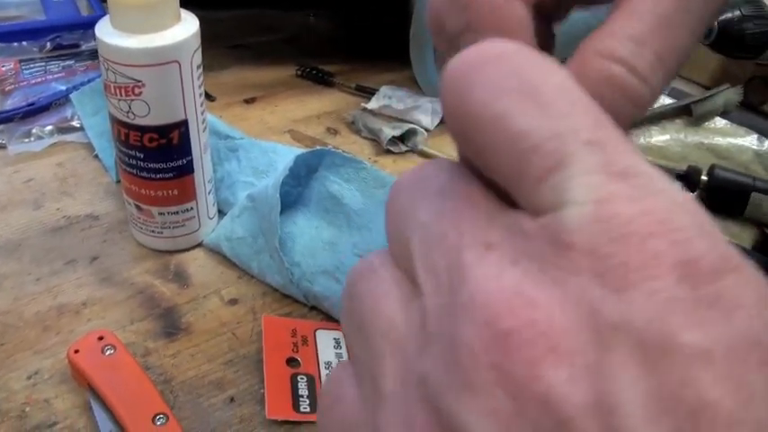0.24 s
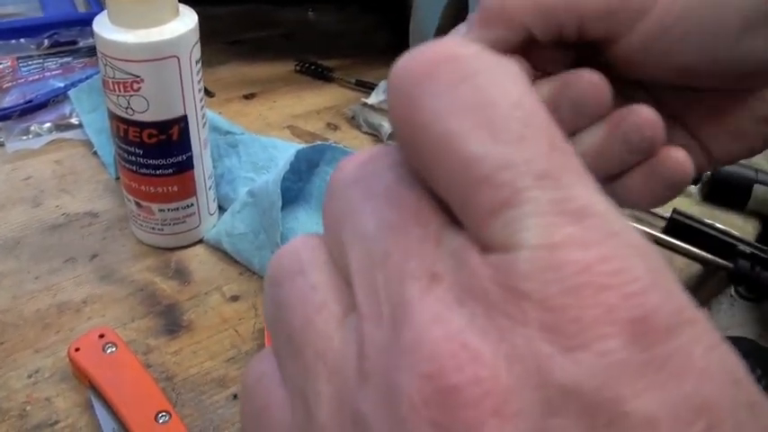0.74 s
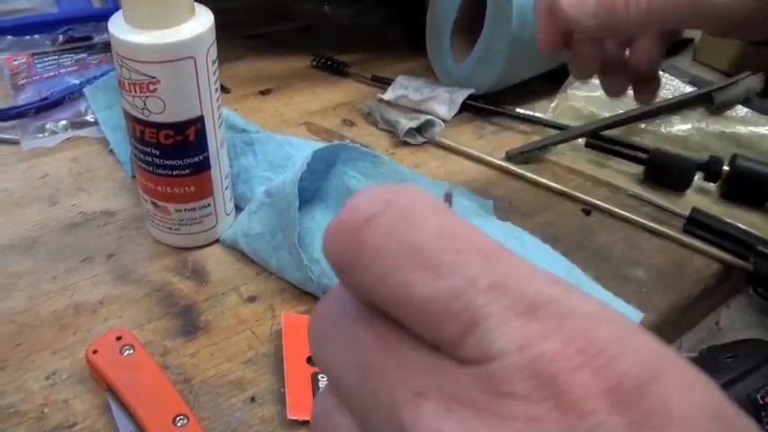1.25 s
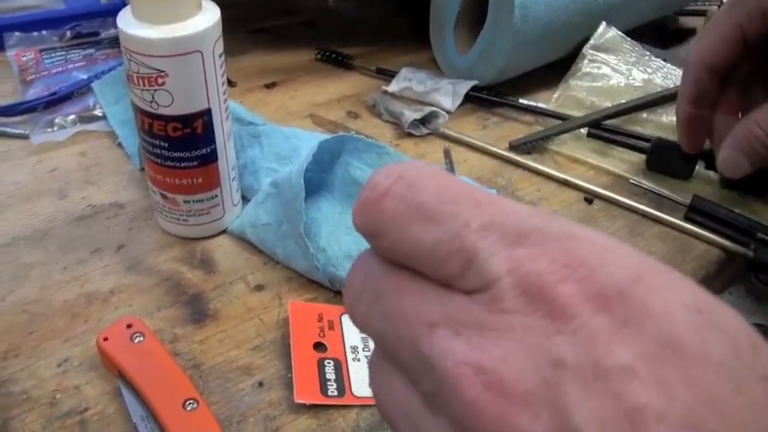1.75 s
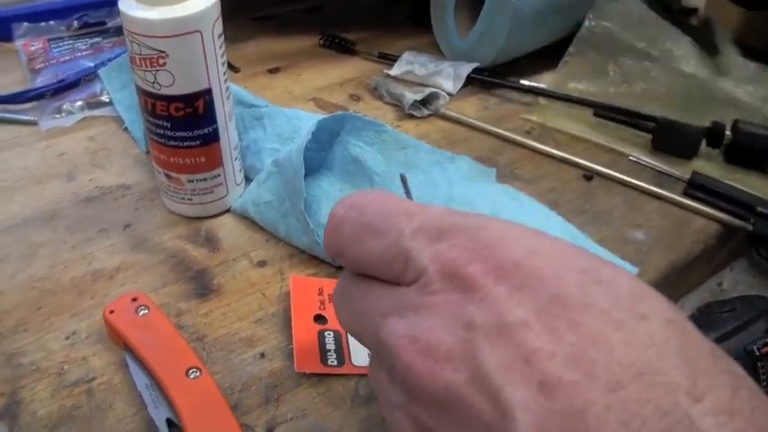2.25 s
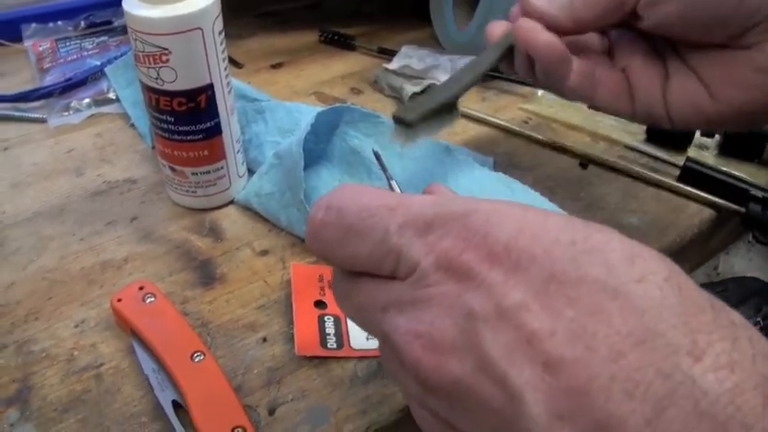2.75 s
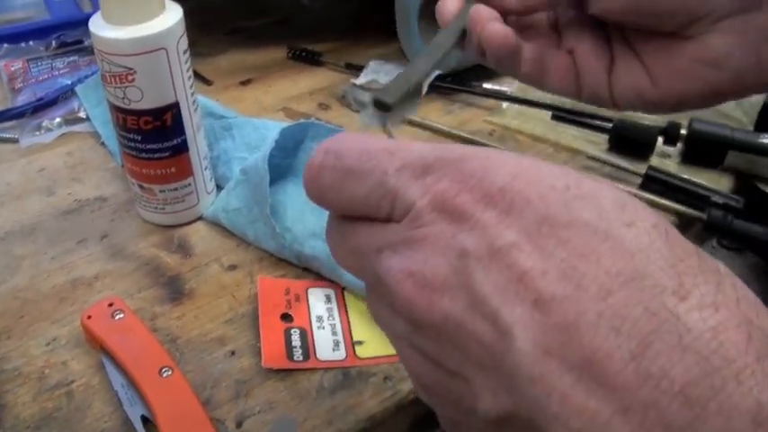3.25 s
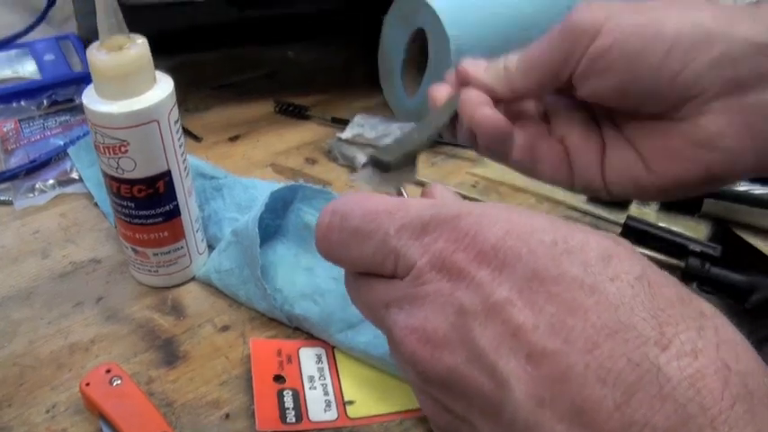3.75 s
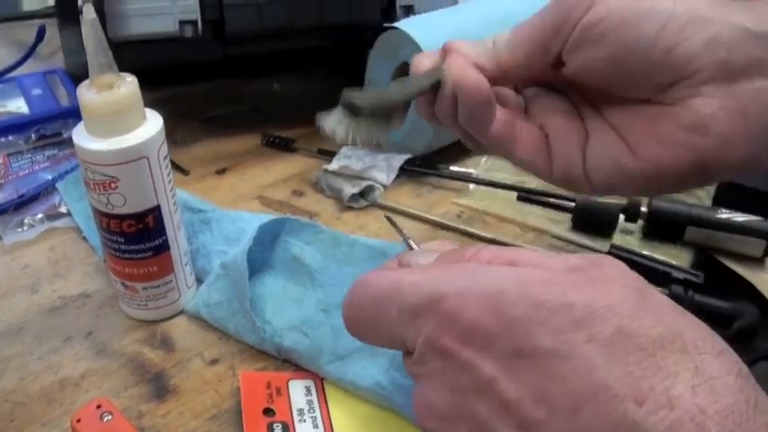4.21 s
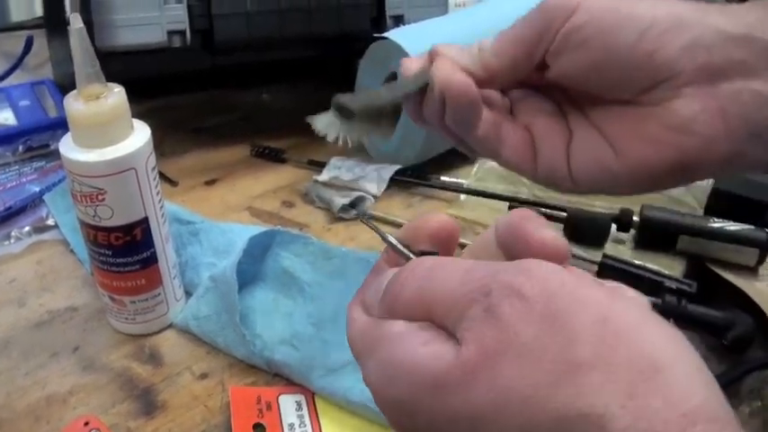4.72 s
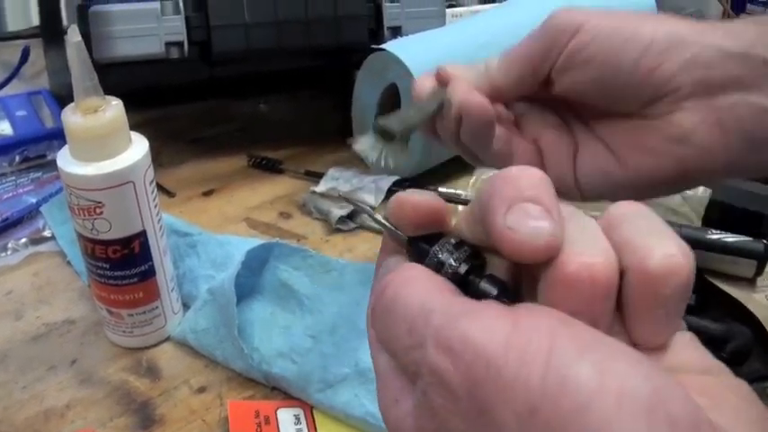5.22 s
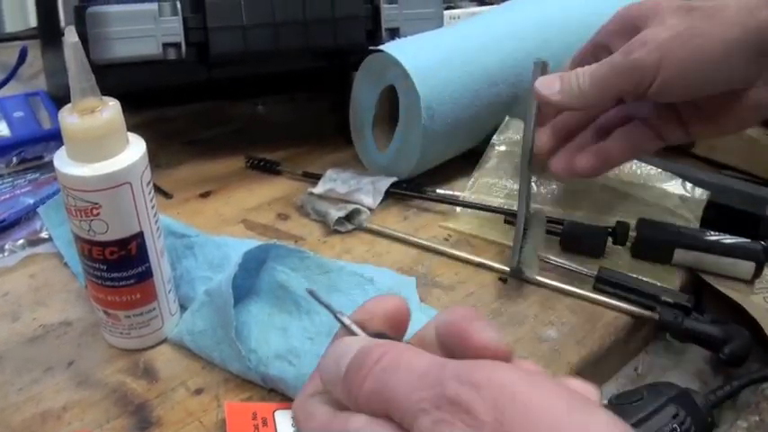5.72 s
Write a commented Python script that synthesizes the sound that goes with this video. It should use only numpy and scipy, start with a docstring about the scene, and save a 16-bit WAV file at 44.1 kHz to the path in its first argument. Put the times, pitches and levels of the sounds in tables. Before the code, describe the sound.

A close stereo view of a wooden bench in a small workshop, with steady soft hiss and a very faint low hum. For the first two seconds there is little but gentle finger rubs, light swishes and tiny ticks, around 0.6 to 1.3 s. From about 2.05 to 2.55 s a brush is grabbed from among tools: dense hard clacks, bright rattles and small bench thumps, with a plastic bag crackling, slightly to the right. From 2.75 to 5.45 s come eleven brisk bristle strokes over a small steel tap, roughly one every quarter second. Each is a dry, high, scratchy swish under a tenth of a second, some starting with a tick, with slight hollow brush-head and thin metal ringing; the last ones are loudest. At about 5.8 to 5.95 s the brush drops back with a few clacks, a crisp crinkle and a soft hand rub. Short faint room reverberation follows.

```python
"""At a wooden workbench, close up, a stiff cleaning brush is picked off a plastic bag among tools.
The knocks are short bursts of tiny impacts that ring the tools and thump the bench; the bag is snapping creases.
The bristles sweep eleven times across a small steel thread tap, as streams of clicks that also shake the brush head
and the tap; then the brush is dropped back. Fingers rub and tick softly, made from swelling noise and short clicks.
The small workshop adds echoes, a quiet hiss and a low hum."""
import sys
import numpy as np
from scipy import signal
from scipy.fft import rfft, irfft, next_fast_len
from scipy.io import wavfile

SR = 44100
rng = np.random.default_rng(int(sys.argv[2]) if len(sys.argv) > 2 else 0)


def to_wav(s):
    """Save 16-bit WAV."""
    ch = np.atleast_2d(s).T  # columns
    pcm = np.round(np.clip(ch, -1, 1) * 32767)  # PCM
    wavfile.write(sys.argv[1], SR, pcm.astype(np.int16))


N = 263277
TIME = np.arange(N) / SR


def from_db(db):
    """Turn decibels into an amplitude factor."""
    return 10 ** (np.asarray(db) / 20)


def rms_one(x):
    """Scale a sound to an rms level of 1."""
    return x / np.sqrt(np.mean(x ** 2) + 1e-20)


def band(x, low_hz, high_hz, order=2):
    """Keep only the pitches between two limits (Butterworth band-pass)."""
    edges = [low_hz, min(high_hz, .47 * SR)]
    return signal.sosfilt(signal.butter(order, edges, "band", fs=SR, output="sos"), x + 1e-18)


def resonate(x, hz, width_hz):
    """Ring at one pitch, with gain 1 at the peak; a narrower width rings longer."""
    r = np.exp(-np.pi * width_hz / SR)
    gain = (1 - r * r) / 2
    feedback = [1, -2 * r * np.cos(2 * np.pi * hz / SR), r * r]
    return signal.lfilter(np.array([1, 0, -1]) * gain, feedback, x + 1e-18)


def ring(x, modes):
    """An object that is struck or shaken answers at all its own pitches at once."""
    return sum(from_db(db) * resonate(x, hz, width) for hz, width, db in modes)


def colour(x, spectrum):
    """Filter a sound to follow a spectrum, without smearing it ahead in time (minimum phase); rms 1."""
    size = 2 * next_fast_len(N // 2 + 4096)
    hz, db = np.transpose(spectrum)
    grid = np.maximum(np.arange(size // 2 + 1) * SR / size, 1)
    gain = from_db(np.interp(np.log(grid), np.log(hz), db))
    cepstrum = irfft(np.log(gain))
    # folding the cepstrum onto positive times gives the minimum-phase filter
    response = np.exp(rfft(2 * cepstrum[:size // 2], size))
    return rms_one(irfft(rfft(x, size) * response)[:N])


def add(track, s, sound):
    """Lay a short sound into a track."""
    start = int(s * SR)
    track[start:start + len(sound)] += sound[:N - start]


def grains(per_s, spread_db):
    """Tiny clicks of uneven size at random moments; rms 1."""
    sizes = from_db(spread_db * np.minimum(rng.exponential(1, N), 4))
    signed = sizes * rng.choice([-1, 1], N)
    return rms_one(signed * (rng.random(N) < per_s / SR))


def contact(rise_s, decay_s, tail_db, tail_s):
    """Two things touch: a burst of tiny impacts that dies fast, then a weaker shiver."""
    t = TIME[:SR // 10]
    fading = np.exp(-t / decay_s) + from_db(tail_db) * np.exp(-t / tail_s)
    shape = np.minimum(t / rise_s, 1) * fading
    return shape * rng.choice([-1, 1], len(t)) * rng.uniform(.5, 1, len(t))


def at_level(burst, db):
    """Scale a burst to an rms level over its first 6 ms."""
    return from_db(db) * burst / np.sqrt(np.mean(burst[:int(.006 * SR)] ** 2))


def swell(s, length_s):
    """A smooth bell in time, centred on a moment."""
    return np.exp(-2 * ((TIME - s) / length_s) ** 2)


def place(x, pan_db):
    """Place a sound in stereo; pan_db is the left level minus the right."""
    return x * from_db([[pan_db / 2], [-pan_db / 2]])


# Colour of the room hiss: pitch_hz, gain_db
AIR_COLOUR = [(18, -49), (30, -2), (124, -8.5), (174, -4.5), (328, -2.5), (384, -4.5), (760, -1),
              (889, -4.5), (1280, -5), (1630, -7.5), (2230, -8.5), (8520, -17), (14800, -19), (16000, -24)]
AIR_DB = -58.5   # rms level of the part shared by both sides
HUM_HZ, HUM_DB = 118.5, -72.5


def background(side_db=-1):
    """Steady noise that differs from left to right makes the hiss; one sine makes the low hum."""
    mid, side = [colour(noise, AIR_COLOUR) for noise in rng.standard_normal((2, N))]
    hiss = mid + from_db(side_db) * side * [[1], [-1]]
    hum = np.sin(2 * np.pi * HUM_HZ * TIME)
    return from_db(AIR_DB) * hiss + from_db(HUM_DB) * hum


# Hands shifting on the tool and leaning on the bench: middle_s, length_s, level_db, pitch_hz
HAND_RUBS = [(0.024, 0.25, -61, 290), (.63, 0.023, -54.5, 1970), (1.592, 0.31, -65, 270),
             (1.826, 0.037, -55, 164), (1.828, 0.02, -53.5, 660), (3.014, 0.033, -51.5, 192),
             (3.775, .13, -59.5, 730), (3.827, 0.045, -62.5, 41.2), (4.46, 0.051, -63, 42),
             (4.463, 0.087, -51, 556), (4.503, 0.62, -65, 229), (5.717, 0.21, -59, 1690),
             (5.887, 0.2, -49.5, 260)]


def hands(breadth=1.04):
    """Skin rubs on the tool holder and the bench: many tiny slips, each rub swelling around its own pitch."""
    friction = grains(per_s=3400, spread_db=0.5)
    out = np.zeros(N)
    for s, length, db, hz in HAND_RUBS:
        rub = band(resonate(friction, hz, breadth * hz), hz / 2, 3 * hz, order=1)
        out += from_db(db) * swell(s, length) * rms_one(rub)
    return out


# Single bristles or a fingertip flicking the tap: start_s, level_db, pitch_hz
FLICKS = [(0.6233, -48.5, 3500), (1.19, -48.5, 3470), (3.3526, -29, 1880), (3.6082, -32.5, 5000),
          (4.077, -34, 3920), (4.166, -28.5, 11500), (5.401, -30.5, 10520)]
# Brush strokes, played here and in brushing(): touch_s, grazing_s, rasping_s, level_db,
# touch_tick_db (over level_db), then brush_head_db and tap_ring_db (over level_db, before the trims in brushing)
STROKES = [(2.746, 0.027, .046, -35.5, -10.5, -13, -17.5), (3.0137, 0.047, .028, -28.5, -15, -11, -20),
           (3.294, 0.024, 0.037, -28.5, -31, -13, -33), (3.5494, 0.02, 0.049, -28.5, -14, -14, -18),
           (3.8097, 0.035, 0.059, -30.5, -7, -11, -12), (4.122, .036, 0.027, -33.5, -19, -23, -20),
           (4.3579, 0.015, 0.045, -32, -10.5, -6.5, -3), (4.6142, .023, 0.05, -29, -4.5, -8, -7),
           (4.860, .027, 0.043, -28, -5, -7.5, -15), (5.124, .029, 0.029, -26, -7, -6.5, -14),
           (5.3769, .051, .038, -24.5, -25, -11.5, -12.5)]
# Pitches of the steel tap in its holder: pitch_hz, width_hz, gain_db
TAP_MODES = [(3480, 79, 10), (3675, 144, 13), (4770, 380, 2), (7080, 200, 5.5), (9950, 320, 9.5),
             (12000, 370, -2)]
TOUCH_HZ = 4020   # extra ring at the first touch of each stroke


def flicks(steel_db=-4, ring_db=-4, ring_width_hz=600):
    """A bristle or fingertip catches and lets go with a bright tick of the steel; every stroke starts with one."""
    out = np.zeros(N)
    touches = [(s, db + tick, TOUCH_HZ) for s, _, _, db, tick, _, _ in STROKES]
    for s, db, hz in touches + FLICKS:
        blow = contact(rise_s=0.001, decay_s=0.0016, tail_db=-20, tail_s=0.014)
        tick = rms_one(band(blow, 4550, 11600))
        steel = from_db(steel_db) * rms_one(ring(blow, TAP_MODES))
        own_ring = from_db(ring_db) * rms_one(resonate(blow, hz, ring_width_hz))
        add(out, s, at_level(tick + steel + own_ring, db))
    return out


DRAG_RELEASE_S = 0.01
UNCRUMPLE_DB, UNCRUMPLE_S = -20, 0.056   # the bag relaxes after each drag


def drag_force(s, rise_s, hold_s):
    """A drag builds, holds and stops; the bag goes on relaxing."""
    after = np.maximum(TIME - s - rise_s - hold_s, 0)
    build = np.clip((TIME - s) / rise_s, 0, 1)
    release = np.exp(-after / DRAG_RELEASE_S)
    relaxing = from_db(UNCRUMPLE_DB) * np.exp(-after / UNCRUMPLE_S)
    return build * np.maximum(release, relaxing)


# Bag and fingers swishing lightly: middle_s, length_s, level_db
SWISHES = [(0.632, .035, -57.5), (.807, .029, -52.5), (.902, 0.044, -57), (1.12, .024, -60),
           (1.197, 0.019, -57), (5.743, 0.12, -62), (5.823, 0.021, -38.5)]
# Brush shoved or slid over the plastic bag: start_s, rise_s, hold_s, level_db (before drag_db)
DRAGS = [(2.051, 0.013, 0.02, -23), (2.09, 0.043, 0.032, -31.5), (2.172, 0.012, 0.046, -41),
         (2.272, 0.0025, .006, -38), (2.301, 0.0067, 0.055, -34.5), (2.354, 0.0072, .028, -21),
         (2.48, 0.078, 0.027, -51), (5.478, 0.23, .17, -53), (5.802, .003, 0.023, -38.5),
         (5.846, 0.0025, 0.0067, -32.5), (5.882, 0.00092, 0.0063, -27.5)]
# Colour of the bag crinkle: pitch_hz, gain_db
BAG_COLOUR = [(70, -60), (120, -14.5), (160, -2), (200, -1.5), (400, -6.5), (560, 1.5), (880, -6),
              (1110, -8.5), (1400, 0), (3200, -6.5), (4700, -8), (7400, -3.5), (12000, -16), (16000, -25)]
# Colour of the bristle hiss, for light swishes and for brushing(): pitch_hz, gain_db
BRISTLE_COLOUR = [(200, -18), (700, -9), (1800, -7.5), (2800, -8), (4200, 0.5), (5900, -0.5), (7300, 3),
                  (8800, 1), (10500, 7), (13000, 1), (16000, -12.5)]


def bag(drag_db=-1, clump_db=2.5, crease_db=-6):
    """Creases snap in clumps at many pitches under the dragged brush; light touches only swish."""
    force = sum(from_db(db + drag_db) * drag_force(s, rise, hold) for s, rise, hold, db in DRAGS)
    clumps = from_db(clump_db * rms_one(band(rng.standard_normal(N), 28, 130)))
    scrape = colour(grains(per_s=9000, spread_db=2.5), BAG_COLOUR)
    crease_pitches = np.geomspace(1300, 7000, num=12)
    creases = rms_one(sum(resonate(grains(per_s=84, spread_db=8.0), hz, 210) for hz in crease_pitches))
    crinkle = force * rms_one(clumps * (scrape + from_db(crease_db) * creases))
    touch = sum(from_db(db) * swell(s, length) for s, length, db in SWISHES)
    swish = touch * colour(grains(per_s=4800, spread_db=-0.5), BRISTLE_COLOUR)
    return place(crinkle, pan_db=-3.0) + swish


# The tools keep jiggling while the brush is lifted
JIGGLE_FROM_S, JIGGLE_TO_S = 2.13, 2.5
JIGGLE_DB, JIGGLE_SPREAD_DB = -40.5, 6.5   # middle level before clack_db in knocks(), and spread either way


def jiggles(count=12, hardness_db=-13, thud_db=-13):
    """Small chance knocks, spread loosely over the lifting of the brush."""
    slot, size, pitch = rng.random((count, 3)).T
    times = JIGGLE_FROM_S + (JIGGLE_TO_S - JIGGLE_FROM_S) * (np.arange(count) + slot) / count
    levels = JIGGLE_DB + JIGGLE_SPREAD_DB * (2 * size - 1)
    pitches = 1400 * 3 ** pitch
    return [(s, db, hardness_db, thud_db, hz) for s, db, hz in zip(times, levels, pitches)]


# Handle and tools knocking: start_s, level_db, hardness_db (treble over level_db), thud_db (bench over level_db),
# pitch_hz; the levels are before the trims clack_db, snap_db, bench_db and thud_db below
KNOCKS = [(0.8803, -47.5, -49, -32, 920), (0.8823, -51, -35, -27, 2300), (1.2679, -51.5, -15, -20, 3720),
          (1.303, -55, -25, -16, 1600), (1.6203, -50, -25, -6, 970), (2.0396, -48, -38, -2, 1590),
          (2.0644, -18.5, -6, -15, 3000), (2.0717, -20.5, -6, -8.5, 2900), (2.0828, -21, -9.5, -7.5, 1800),
          (2.1443, -26.5, -3.5, -13, 4770), (2.2052, -32, -7, -12, 5750), (2.2777, -24, -14, -14, 2750),
          (2.3082, -31.5, -10, -14, 1930), (2.3628, -22, -1, -6, 1670), (2.3699, -28, 1, 0, 600),
          (2.379, -18.5, -8, -10.5, 3300), (2.384, -18, -12, -16, 3330), (2.4009, -24, -15, -15, 2480),
          (2.4871, -37, -9, -20, 3850), (2.5087, -30, -8.5, -21, 4930), (2.548, -27, -2, -17.5, 2200),
          (2.668, -51.5, -21, -16, 2230), (3.415, -29, -31, -27, 1420), (5.8123, -33, -23, -20, 1620),
          (5.8469, -25.5, -13, -17, 1640), (5.8856, -19.5, -6, -14, 4220),
          (5.8862, -26.5, -28, -21.5, 2960), (5.9451, -39, -14, -2, 1600)]
# Where the knocking happens: time_s, pan_db (left minus right)
CLATTER_PAN = [(.9, 6), (2.06, -5), (2.55, -3), (5.85, -1.5)]
PAN_SCATTER_DB = 2   # either way, from knock to knock
# Pitches of the brush handle and the rods it touches: pitch_hz, width_hz, gain_db
HANDLE_MODES = [(1540, 71, 9), (1740, 220, -21), (2060, 220, 10), (2320, 160, -7), (2470, 56, -15),
                (3190, 81, 7), (4000, 320, -9), (4030, 280, 5), (5300, 290, 5)]
# Pitches of the bench top: pitch_hz, gain_db (before bench_db), t60_s (time to fade by 60 dB)
BENCH_MODES = [(186, -37, 0.16), (246.3, 3, 0.2), (278, -1, 0.063), (504, -6, 0.099), (577, -1.5, 0.16),
               (682, 3, 0.036), (899, 10, 0.11)]
RING_PER_HARDNESS = 0.6   # dB of ring lost per dB of hardness: soft contacts ring more purely
AHEAD_S, AHEAD_DB = .003, -24.5   # a faint copy of each knock about 3 ms ahead softens its onset


def knocks(ring_db=-8, ring_width_hz=300, crack_db=-5, thud_db=-6.0, bench_db=2, clack_db=-1.5,
           snap_db=-1, rise_s=.0008):
    """Each knock cracks, rings the handle and the part that is struck, and thumps the bench top."""
    out, thuds = np.zeros((2, N)), np.zeros(N)
    for s, db, hardness, thud, hz in KNOCKS + jiggles():
        blow = contact(rise_s=rise_s, decay_s=0.0016, tail_db=-16.5, tail_s=0.011)
        # the hardest instant of the contact is one sharp click
        blow[int(rise_s * SR)] += from_db(crack_db) * np.sqrt(np.sum(blow ** 2))
        rattle = rms_one(rms_one(band(blow, 1750, 5200)) + rms_one(ring(blow, HANDLE_MODES)))
        ring_level = from_db(ring_db - RING_PER_HARDNESS * hardness)
        body = rattle + ring_level * rms_one(resonate(blow, hz, ring_width_hz))
        clack = at_level(body, db + clack_db)
        snap = at_level(band(blow, 8600, 12500, order=3), db + hardness + snap_db)
        pan_db = np.interp(s, *np.transpose(CLATTER_PAN)) + PAN_SCATTER_DB * rng.uniform(-1, 1)
        for track, side in zip(out, place(clack + snap, pan_db)):
            add(track, s - rise_s / 2, side)
            add(track, s - AHEAD_S, from_db(AHEAD_DB) * side)
        add(thuds, s, at_level(band(blow, 137, 880), db + thud))
    # a fade of 60 dB in t60 seconds sets the width of each bench resonance
    bench = sum(from_db(db) * resonate(thuds, hz, np.log(1000) / np.pi / t60) for hz, db, t60 in BENCH_MODES)
    return out + from_db(thud_db) * thuds + from_db(bench_db) * bench


BITE_S, BITE_DB, LEAVE_DB = 0.0056, -3, -4   # bite time; force at both ends of the rasp against its peak
PEAK_SHARE = 0.42   # of the rasp, until the tuft is bent most
SETTLE_S, SETTLE_DB = 0.0089, 22   # the bristles spring back; force is then this far below its peak


def stroke_force(bite, leave):
    """The tuft bites, bends to a peak, leaves the tap and settles."""
    peak = bite + PEAK_SHARE * (leave - bite)
    moments = [bite - 2 * BITE_S, bite, peak, leave, leave + SETTLE_S, leave + 4 * SETTLE_S]
    levels_db = [-24, BITE_DB, 0, LEAVE_DB, -SETTLE_DB, -2 * SETTLE_DB]
    return from_db(np.interp(TIME, moments, levels_db, left=-np.inf, right=-np.inf))


# Pitches of the hollow brush head: pitch_hz, width_hz, gain_db
HEAD_MODES = [(745, 41, 4), (985, 320, 3), (1448, 124, 1), (2140, 550, -4)]
# Loose bristles graze after the touch: level against the stroke's, and fading time
GRAZE_DB, GRAZE_FADE_S = -10.5, .06


def brushing(uneven_db=1.3, hiss_db=-1.5, head_db=-1.5, steel_db=2):
    """Bristles slip over the threads: single ones while grazing, a dense rasp once the tuft bites."""
    graze, rasp, head, steel = np.zeros((4, N))
    for touch, grazing, rasping, db, _, head_share, tap_share in STROKES:
        bite, leave = touch + grazing, touch + grazing + rasping
        is_grazing = (TIME > touch) & (TIME < bite)
        graze += from_db(db + GRAZE_DB) * is_grazing * np.exp(-np.abs(TIME - touch) / GRAZE_FADE_S)
        force = from_db(db) * stroke_force(bite, leave)
        rasp += force
        # the head is shaken harder as the bristles bend
        head += force * from_db(head_share) * np.interp(TIME, [bite, leave], [.6, 1.3])
        steel += force * from_db(tap_share)
    slips, catches = grains(per_s=14000, spread_db=2), grains(per_s=2700, spread_db=5.5)
    uneven = from_db(uneven_db * rms_one(band(rng.standard_normal(N), 34, 155)))
    hiss = rasp * uneven * colour(slips, BRISTLE_COLOUR) + graze * colour(catches, BRISTLE_COLOUR)
    hollow = rms_one(ring(grains(per_s=7200, spread_db=0), HEAD_MODES))
    shakes = grains(per_s=9900, spread_db=-3.0)
    # the force drives the tap, so the steel rings on after the stroke
    ringing = ring(steel * shakes, TAP_MODES) / np.std(ring(shakes, TAP_MODES))
    return from_db(hiss_db) * hiss + from_db(head_db) * head * hollow + from_db(steel_db) * ringing


ROOM_T60_S, ROOM_DB, WALL_CUT_HZ = 0.49, -25, 4700


def room_tail(x):
    """Scattered reverberation that builds up briefly and dies away, made from fading noise."""
    t = TIME[:SR // 2]
    noise = band(rng.standard_normal(len(t)), 130, WALL_CUT_HZ, order=1)
    tail = noise * from_db(-60 * t / ROOM_T60_S) * np.minimum(t / 0.019, 1)
    return signal.fftconvolve(x, tail / np.sqrt(np.sum(tail ** 2)))[:N]


# Reflections from bench, hands and shelves: delay_s, level_db, pan_db (left minus right)
ECHOES = [(.0011, -47, -3), (.0023, -28, -24.5), (.0049, -26.5, 23.5), (.0072, -25.5, 7)]


def workshop(x):
    """Near surfaces echo at once from either side, then the room answers from all round."""
    near = np.zeros((2, N))
    for delay, db, pan_db in ECHOES:
        delayed = np.concatenate([np.zeros(int(delay * SR)), x])[:N]
        near += place(from_db(db) * delayed, pan_db)
    return near + from_db(ROOM_DB) * np.array([room_tail(x), room_tail(x)])


def scene():
    """The knocks and bag are panned; brushing, flicks and hands sit in the middle, and the room answers all."""
    direct = knocks() + bag() + brushing() + flicks() + hands()
    return direct + workshop(direct.mean(axis=0)) + background()


NARROW_HZ = 413   # below this the two sides grow alike
CUTOFF_HZ = 16100


def record(dry):
    """The stereo is narrow in the bass; the highest treble is gently narrowed too, and the top is cut."""
    mid, side = (dry[0] + dry[1]) / 2, (dry[0] - dry[1]) / 2
    hz = np.arange(N + 1) * SR / (2 * N)
    width = hz / np.hypot(hz, NARROW_HZ) * np.interp(hz, [10500, 12500], [1, .35])
    narrowed = irfft(rfft(side, 2 * N) * width)[:N]
    stereo = mid + narrowed * [[1], [-1]]
    return signal.sosfilt(signal.ellip(10, .1, 80, CUTOFF_HZ, fs=SR, output="sos"), stereo)


dry = scene()
out = record(dry)
to_wav(out)
```